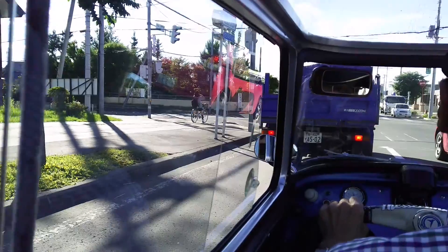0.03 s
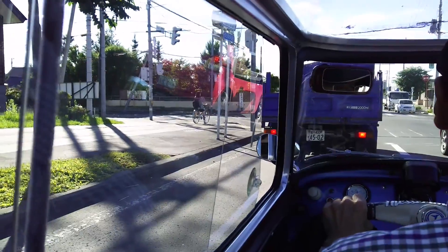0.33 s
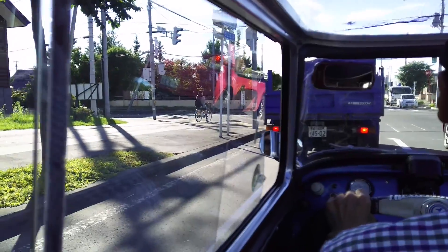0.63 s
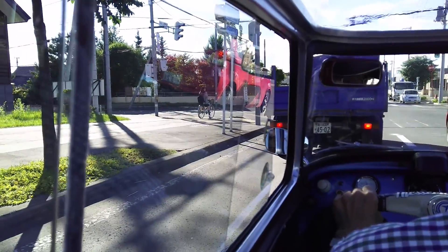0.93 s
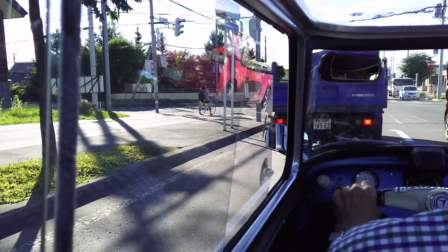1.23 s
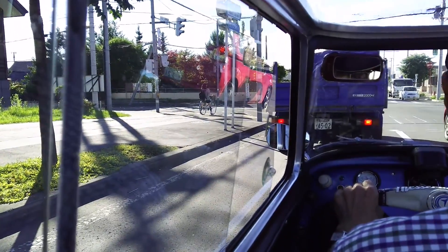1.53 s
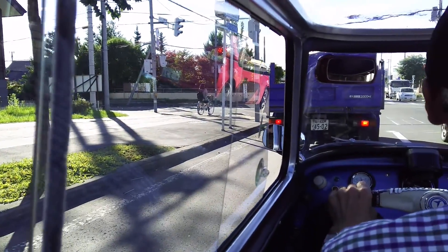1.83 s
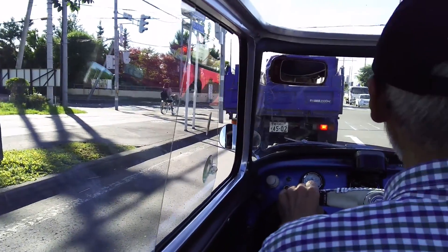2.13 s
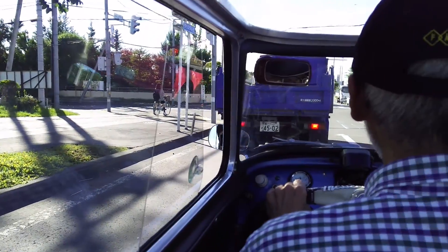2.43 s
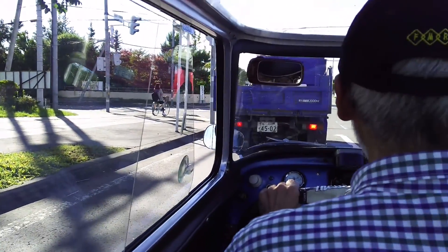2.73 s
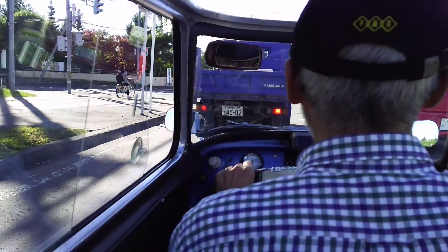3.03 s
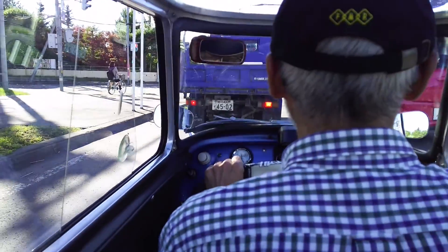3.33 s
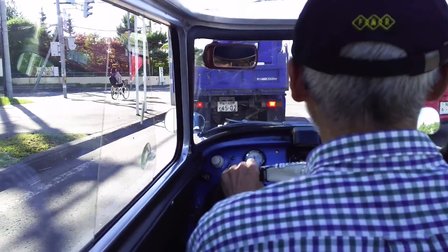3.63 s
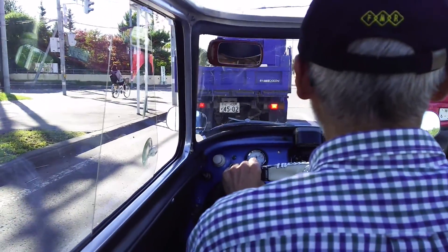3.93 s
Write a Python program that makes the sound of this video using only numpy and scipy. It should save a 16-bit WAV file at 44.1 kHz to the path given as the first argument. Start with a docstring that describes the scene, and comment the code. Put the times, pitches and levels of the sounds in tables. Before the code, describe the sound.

A small engine idles throughout, heard inside a stopped car, slightly to the right. It hums and clatters, with uneven low thumps several times a second, each ringing a metal part. Faint traffic hiss and another engine's drone lie underneath. Loose trim clicks occasionally and knocks until about 2.3 seconds. Near 3 seconds come a soft scuff and rustle, then a light whirr and high hiss swell.

```python
"""A tiny single-cylinder engine idles, heard inside a small car at a junction. From the start traffic
hisses, another idle drones, and the shaft hums, clatters and ticks once a turn. Every second to fifth
turn a hard firing booms in the cabin, barks in the exhaust and rings a metal part. Loose trim clicks
and, until about 2.3 s, knocks. Near 3 s it scuffs and rustles; then a bearing whirr and a high street
hiss swell, and the sound leans further to the right."""
import sys
import numpy as np
from scipy import signal
from scipy.fft import rfft, irfft, next_fast_len
from scipy.io import wavfile
from scipy.ndimage import uniform_filter1d, minimum_filter1d, map_coordinates

SR = 44100
rng = np.random.default_rng(int(sys.argv[2]) if len(sys.argv) > 2 else 0)


def log_audio(samples):
    """Write samples as a 16-bit WAV file to the path given in sys.argv[1]."""
    # one column per channel
    frames = np.atleast_2d(samples).T
    # limit to full scale, then quantise
    limited = np.clip(frames, -1, 1)
    pcm = np.round(limited * 32767).astype(np.int16)
    wavfile.write(sys.argv[1], SR, pcm)


N = 176400
TURNS_PER_S = 24.87
LEFT_RIGHT = np.array([[.5], [-.5]])  # splits a difference between the ears

# Hard firings and the relative level of each effect: time_s, ring_db, boom_db, bark_db, rasp_db
FIRINGS = [(0.132, -39, -16.5, -27, -45.5), (0.254, -35.5, -10, -25, -44.5),
           (0.373, -45, -22.5, -27.5, -45.5), (0.45, -36.5, -13.5, -34, -46),
           (0.573, -35, -17.5, -23, -45.5), (0.693, -35.5, -14.5, -24, -52), (0.812, -36, -10, -32, -48),
           (0.929, -43.5, -12, -28.5, -45.5), (1.13, -38, -11, -27, -45), (1.247, -35.5, -12.5, -30, -42.5),
           (1.363, -46.0, -11.5, -36, -52.5), (1.447, -37, -9, -32, -55.5), (1.567, -40.5, -13.5, -23, -43),
           (1.727, -37, -14, -26.5, -43.5), (1.844, -53, -14, -30.5, -43.5),
           (1.922, -45, -12.5, -31, -51.5), (2.046, -34.5, -14.5, -27.5, -45.5),
           (2.249, -34, -9, -27.5, -47.5), (2.371, -31, -15, -27.5, -44),
           (2.491, -32.5, -12.5, -31.5, -54.5), (2.611, -36, -15, -34, -54),
           (2.774, -35.5, -10.5, -27.5, -44), (2.978, -30.5, -7.5, -29.5, -47),
           (3.098, -43, -26, -36.5, -52.5), (3.18, -32.5, -11.5, -31, -47),
           (3.302, -27.5, -13, -29.5, -44.5), (3.422, -30.5, -18, -36, -49),
           (3.544, -37.5, -14.5, -34, -52), (3.626, -39.5, -20.5, -41.5, -48.5),
           (3.705, -39, -15, -35.5, -50.5), (3.788, -32.5, -11, -27, -48),
           (3.909, -30, -14.5, -29.5, -48.5)]
# Slow swells of three steady layers: time_s, traffic_db, whirr_db, clatter_db
SWELLS = [(0, -45, -67, -32), (.25, -49, -55, -32), (.6, -52.5, -73, -32.5), (.9, -54.5, -67.5, -31),
          (1.6, -54.5, -52.5, -32.5), (2.3, -53.5, -70, -33.5), (2.68, -54.5, -66, -37.5),
          (2.9, -55.5, -50.5, -30.5), (3.2, -53.5, -51.5, -34.5), (3.501, -56.5, -47, -34.5),
          (4, -55.5, -51.5, -34.5)]


def amp(db):
    """Decibels to amplitude ratio."""
    return 10 ** (np.asarray(db) / 20)


def unit(x):
    """Normalisation to rms 1."""
    return x / np.sqrt(np.mean(x ** 2) + 1e-20)


def along(points, hz):
    """Interpolation of (frequency_hz, value) points on a logarithmic axis."""
    f, v = np.transpose(points)
    return np.interp(np.log(hz + 1), np.log(f + 1), v)


def clock():
    """Time of every sample in seconds."""
    return np.arange(N) / SR


def contour(table, column=1):
    """Linear interpolation of one column over time."""
    columns = np.transpose(table)
    return np.interp(clock(), columns[0], columns[column])


def wobble(rate):
    """Smooth random modulation, with rate knots a second."""
    return map_coordinates(rng.standard_normal(int(N * rate / SR) + 4), [clock() * rate])


def filtered(x, response):
    """Linear filtering: the spectrum times a frequency response."""
    m = next_fast_len(N + SR // 2)
    return irfft(rfft(x, m) * response(np.fft.rfftfreq(m, 1 / SR)), m)[..., :N]


def noise(gain):
    """Interaural coherence: stereo noise of rms 1, alike at both ears in the bass only."""
    # Likeness of left and right: frequency_hz, correlation
    coherence = [(150, 0.97), (300, 0.86), (600, 0.45), (1200, 0.039), (2000, -0.21), (3000, 0.14),
                 (12000, -0.039)]

    def response(hz):
        angle = np.arccos(np.clip(along(coherence, hz), -1, 1)) / 2
        return gain(hz) * np.array([np.cos(angle), np.sin(angle)])
    mid, side = filtered(rng.standard_normal((2, N)), response)
    return unit(np.array([mid + side, mid - side]))


def rush(spectrum):
    """Broadband noise of a given spectral shape."""
    return noise(lambda hz: amp(along(spectrum, hz)))


def narrow(centre_hz, width_hz):
    """Random excitation of one resonance."""
    return noise(lambda hz: 1 / (1 + (2 * (hz - centre_hz) / width_hz) ** 2))


def patchy(x, depth_db=2):
    """Random modulation in small patches of time and frequency."""
    spectrogram = signal.stft(x, nperseg=1024)[2]
    field = uniform_filter1d(rng.standard_normal(spectrogram.shape[1:]), size=6, axis=0)
    field = unit(uniform_filter1d(field, size=5, axis=1))
    return unit(signal.istft(spectrogram * amp(depth_db * field), nperseg=1024)[1][:, :N])


def bursts(times, levels_db, attack_s, t60_s):
    """Envelope with a Gaussian rise to each time and an exponential decay after it."""
    out, t = np.zeros(N), clock()
    for s, db in zip(times, levels_db):
        rise = np.exp(-(np.minimum(t - s, 0) / attack_s) ** 2)
        out += rise * amp(db - 60 * np.clip(t - s, 0, 2 * t60_s) / t60_s)
    return out


def struck(times, levels_db, modes, attack_s, scatter_db, detune):
    """Free vibration: a complex sum of damped modes, a little different at every blow."""
    out, t = np.zeros(N + SR, complex), np.arange(SR // 4) / SR
    hz, db, t60_s = np.transpose(modes)[:, :, None]
    rise = 1 - np.exp(-(t / attack_s) ** 2)
    for s, level in zip(times, levels_db):
        size, pitch = rng.standard_normal((2, len(modes), 1))
        decay = amp(level + db + scatter_db * size - 60 * t / t60_s)
        tones = np.exp(2j * np.pi * hz * (1 + detune * pitch) * t)
        out[max(round(s * SR), 0):][:len(t)] += (decay * tones).sum(0) * rise
    return out[:N]


def once_a_turn(turns, lead_s, decay_s):
    """Periodic excitation: a decaying pulse of slightly varying size on every turn, rms 1."""
    count, part = np.divmod(turns - np.floor(turns[0]) + 1 + lead_s * TURNS_PER_S, 1)
    sizes = amp(2 * rng.standard_normal(size=128))
    pulses = sizes[count.astype(int)] * np.exp(-part / TURNS_PER_S / decay_s)
    return unit(uniform_filter1d(pulses, int(.002 * SR)))  # 2 ms edges


def traffic(turns):
    """Broadband street noise, with a little of the engine's own hiss pulsing in it."""
    # Spectra of the street hiss and of a higher fizz: frequency_hz, density_db
    hiss_spectrum = [(200, -9), (1000, 8), (2000, 4.5), (2800, 2), (3200, -1.5), (4200, -2), (5200, -3.5),
                     (7000, -2.5), (8200, -14), (9400, -8), (11200, -9.5), (13000, -26.5), (15000, -41.5)]
    fizz_spectrum = [(3000, -26), (4200, -6.5), (5000, 2.5), (6000, -2.5), (7200, -13), (9000, -14.5),
                     (14000, -39)]
    # Swells of the fizz: time_s, level_db
    fizz_swells = [(0, -60.5), (.5, -54), (1, -71.5), (2.7, -66), (3.101, -59), (3.5, -52.5), (4, -53)]
    flutter = unit(1 + .13 * once_a_turn(turns, lead_s=.0037, decay_s=.008))
    fizz = amp(contour(fizz_swells)) * patchy(rush(fizz_spectrum))
    hiss_db = contour(SWELLS, column=1) + 2.8 + .42 * wobble(3.1)
    return amp(hiss_db) * flutter * patchy(rush(hiss_spectrum)) + fizz


def other_idle():
    """Beating: a second engine drones near twice the shaft rate and interferes with the hum."""
    # Partials of the drone: harmonic_number, level_db
    harmonics = [(1, -20), (2, -23.5), (3, -23), (5, -36.5), (6, -47), (7, -45.5), (8, -48.5), (9, -46)]
    # Drift of its fundamental: time_s, pitch_hz
    pitch = [(0, 49.7), (.7, 49.8), (1.4, 50.2), (2.2, 49.7), (3, 49.2), (4, 49.5)]
    angle = 2 * np.pi * np.cumsum(contour(pitch)) / SR
    return np.sqrt(2) * sum(amp(db + 1.33 * wobble(5.58)) * np.sin(k * angle + rng.uniform(0, 2 * np.pi))
                            for k, db in harmonics)


def loose_trim():
    """Impact and friction: loose parts of the cabin click, knock, scuff and rustle."""
    # Clicks and panel knocks: time_s, level_db
    click_events = [(0.022, -38.5), (0.0342, -32.5), (0.0642, -38.5), (0.145, -42), (0.4698, -41.5),
                    (1.077, -36.5), (2.0393, -43), (2.8855, -48), (3.311, -39.5)]
    knock_events = [(0.148, -21), (0.366, -24.5), (0.486, -17), (0.566, -15), (0.606, -12.5),
                    (0.688, -11.5), (0.853, -19), (0.925, -17.5), (1.05, -24), (1.164, -15.5), (1.6, -13.5),
                    (2.246, -17), (2.281, -9.5)]
    # Spectra of click and rustle: frequency_hz, density_db
    click_spectrum = [(500, -8), (2000, -8), (4000, 1), (5500, 0), (7000, -6), (9000, -10.5), (12000, -13),
                      (15000, -26)]
    rustle_spectrum = [(2500, -14), (6000, 0), (10500, -1), (13000, -15), (15000, -32)]
    # Well damped panel modes: frequency_hz, level_db, t60_s
    panel_modes = [(135, 0.5, .04), (250, -2, 0.039), (379, -4, 0.042), (543, -4, 0.035), (800, -14, .02),
                   (970, -20, 0.015)]
    click_s, click_db = np.transpose(click_events)
    knock_s, knock_db = np.transpose(knock_events)
    clicks = rush(click_spectrum) * bursts(click_s + .0031, click_db - .5, attack_s=.0025, t60_s=.054)
    knocks = struck(knock_s, knock_db + 1, panel_modes, attack_s=.0015, scatter_db=1.5, detune=.058).imag
    scuff = narrow(3100, width_hz=800) * bursts([2.865], [-41], attack_s=.039, t60_s=.11)
    rustle = rush(rustle_spectrum) * bursts([3.115], [-57], attack_s=.03, t60_s=.5)
    return clicks + knocks + scuff + rustle


def shaft_turns():
    """Flywheel inertia evens out the speed: turns so far, with the firings near whole turns."""
    firing_s = np.transpose(FIRINGS)[0]
    whole = np.cumsum(np.round(np.diff(firing_s, prepend=firing_s[0]) * TURNS_PER_S))
    drift = np.interp(clock(), firing_s, whole - firing_s * TURNS_PER_S)
    return clock() * TURNS_PER_S + uniform_filter1d(drift, int(.25 * SR))


def bearing_whirr():
    """Frequency and amplitude modulation: each bearing tone wavers and flickers on its own."""
    # Bearing tones: pitch_hz, level_db
    tones = [(1955, 0.5), (2060, -5), (2210, -8), (2590, -11.5), (2690, -6.5)]
    waver, flicker_db = .011, 4
    out = np.zeros((2, N))
    for hz, db in tones:
        pitch_hz = hz * (1 + waver * (wobble(22) + wobble(160)) / np.sqrt(2))
        angle = 2 * np.pi * np.cumsum(pitch_hz) / SR
        level = amp(db + flicker_db * wobble(25))
        ear_phases = np.array([wobble(14), wobble(14)])
        out += level * np.sin(angle + ear_phases)
    return unit(out)


def mechanism(turns):
    """Forced vibration: clatter, tick and whirr pulse with the shaft, over rumble and resonances."""
    # Spectra of the running machinery: frequency_hz, density_db
    clatter_spectrum = [(170, -28.5), (250, -3.5), (420, -4), (560, -11.5), (800, -13), (1250, -18.5),
                        (1750, -23.5), (2800, -26), (3150, -36.5), (6300, -40), (12000, -60.5)]
    tick_spectrum = [(2000, -6), (5000, -1), (8300, -14), (9000, -3), (9400, 7), (9900, -4), (10600, -5),
                     (11100, 2), (11600, -8), (12300, -20.5), (15000, -32.5)]
    rumble_spectrum = [(20, -24.5), (36, -22), (45, -9), (62, -1), (78, -15), (92, -2), (120, -3),
                       (170, -3.5), (192, -16.5), (225, -14), (300, -23.5), (600, -30.5), (1500, -46),
                       (4000, -76.5)]
    # Resonances stirred by the engine: centre_hz, width_hz, level_db
    resonances = [(687, 44, -46), (1056.5, 28, -51.5), (1490, 67, -52.5), (2565, 73, -61),
                  (2764, 77, -65.5), (4920, 45, -70), (6180, 60, -70.5)]
    main_pulse = once_a_turn(turns, lead_s=.0076, decay_s=.019)
    early_pulse = once_a_turn(turns, lead_s=.026, decay_s=.012)
    throb = unit(.95 + main_pulse + .26 * early_pulse)
    clatter = amp(contour(SWELLS, column=3)) * throb * rush(clatter_spectrum)
    tick = amp(-61.5) * once_a_turn(turns, lead_s=.0036, decay_s=.003) * rush(tick_spectrum)
    singing = sum(amp(db) * narrow(hz, width) for hz, width, db in resonances)
    whirr = amp(contour(SWELLS, column=2)) * throb * bearing_whirr()
    return clatter + tick + singing + whirr + amp(-19.5) * rush(rumble_spectrum)


def shaft_hum(turns):
    """Harmonic series of the rotation rate, each order wavering slightly in level."""
    # Shaft orders: cycles_per_turn, level_db
    orders = [(2, -32), (3, -37.5), (4, -27.5), (5, -27.5), (7, -39.5), (15, -48)]
    lag_s, waver_db = .00501, 1.5
    angle = 2 * np.pi * (turns - lag_s * TURNS_PER_S)
    return np.sqrt(2) * sum(amp(db + waver_db * wobble(7.4)) * np.cos(k * angle) for k, db in orders)


def seat_chatter(firing_s, ring_db):
    """Repeated impact: at each firing the metal part hits its seat four times, unevenly."""
    # Short-lived contact modes: frequency_hz, level_db, t60_s
    modes = [(1270, -2, .02), (1580, 2, .02), (1820, -8, .015), (2200, -10, .015), (2480, -10, 0.016),
             (2725, -8, 0.018)]
    slip = rng.uniform(-1, 1, size=(len(firing_s), 4))
    place = np.linspace(-1, 1, 4)
    contact_s = firing_s[:, None] + .011 * (place + slip / 2)
    contact_db = -27.5 + .3 * ring_db[:, None] - 5 * place ** 2  # first and last are weaker
    contact_db += 2 * rng.standard_normal(slip.shape)
    return struck(contact_s.ravel(), contact_db.ravel(), modes, attack_s=.0012, scatter_db=2.5, detune=.03)


def metal_part(firing_s, ring_db):
    """Modal ringing: each firing sets a metal part sounding, roughly and with chatter."""
    # Modes of the part: frequency_hz, level_db, t60_s
    modes = [(1382, -1.5, 0.073), (1473, -7, 0.051), (1508, 5, 0.081), (1612, -12.5, 0.05),
             (1740, -21.5, 0.044), (1970, -16, .05)]
    # Resonances that swell with the ring: centre_hz, width_hz, relative_db, lead_s
    resonances = [(1955, 60, -16, .006), (2690, 70, -17, .022), (4920, 60, -26, .002)]
    rough_db, ear_phase_rad = 3.2, -1.5
    ring = amp(13) * struck(firing_s - .013, ring_db, modes, attack_s=.012, scatter_db=2, detune=.0051)
    rattle = ring * amp(rough_db * wobble(250)) + seat_chatter(firing_s, ring_db)
    overtones = sum(narrow(hz, width) * bursts(firing_s - lead_s, ring_db + db, attack_s=.012, t60_s=.12)
                    for hz, width, db, lead_s in resonances)
    return (rattle * np.exp(1j * ear_phase_rad * LEFT_RIGHT)).imag + overtones


def exhaust(firing_s, bark_db, rasp_db):
    """Transient noise: each firing gives a low bark and a longer, brighter rasp."""
    # Spectra of bark and rasp: frequency_hz, density_db
    bark_spectrum = [(150, -22.5), (260, 3.5), (420, 1.5), (700, -6), (1000, -12), (1800, -19),
                     (3000, -28.5), (8000, -56)]
    rasp_spectrum = [(900, -20), (1800, 2.5), (2300, 3), (2750, 5.5), (3200, -14), (6000, -11.5),
                     (9000, -27), (14000, -38.5)]
    bark = rush(bark_spectrum) * bursts(firing_s - .003, bark_db + 1.5, attack_s=.012, t60_s=.098)
    rasp = rush(rasp_spectrum) * bursts(firing_s - .012, rasp_db + 3.5, attack_s=.013, t60_s=.23)
    return bark + rasp


def cabin_boom(turns, firing_s, boom_db):
    """Cavity resonance: a hard firing kicks the cabin's modes, and again half a turn later."""
    # Cabin modes: frequency_hz, level_db, t60_s
    modes = [(44.2, -12, 0.44), (61.5, -10, 0.25), (91.3, -6, 0.18), (108.7, 1, 0.2), (121.5, -7.5, 0.23),
             (136.7, -11, 0.099), (161.8, -14, 0.12), (206, -22.5, 0.068)]
    lead_s = .00759
    nearest_turn = np.round(np.interp(firing_s, clock(), turns))
    kick_s = np.interp(nearest_turn, turns, clock()) - lead_s
    blow_s = np.concatenate([kick_s, kick_s + .5 / TURNS_PER_S])
    return amp(5) * struck(blow_s, np.tile(boom_db, 2), modes, attack_s=.0069, scatter_db=.5, detune=.017).imag


def scene():
    """Superposition: all sources meet in the cabin, stronger on the right."""
    # Late shift to the right: time_s, left_minus_right_db
    lean = [(3.299, 1), (3.75, -1.5)]
    # Level difference between the ears: frequency_hz, left_minus_right_db
    balance = [(50, -4.5), (130, -5), (230, -7.5), (380, -0.5), (600, -2), (1100, -4.5), (2000, -7),
               (3200, -4.5), (5000, -5), (7500, -9), (9000, -10.5), (11000, 3), (13000, 1)]
    firing_s, ring_db, boom_db, bark_db, rasp_db = np.transpose(FIRINGS)
    turns = shaft_turns()
    hums = shaft_hum(turns) + other_idle()
    boom = cabin_boom(turns, firing_s, boom_db)
    firings = boom + metal_part(firing_s, ring_db) + exhaust(firing_s, bark_db, rasp_db)
    cabin = hums + firings + mechanism(turns) + loose_trim() + traffic(turns)
    cabin *= amp(contour(lean) * LEFT_RIGHT)
    return filtered(cabin, lambda hz: amp(along(balance, hz) * LEFT_RIGHT))


def record(dry):
    """Band and peak limiting: the deepest bass softens, big booms are held down, the top is cut."""
    ceiling, window, top_hz = .92, int(.012 * SR), 15300
    x = filtered(dry, lambda hz: amp(along([(20, -8.5), (33, -10.5), (41, -.5)], hz)))
    needed = ceiling / np.maximum(np.abs(x).max(0), ceiling)
    gain = uniform_filter1d(minimum_filter1d(needed, 2 * window), window)
    return filtered(x * gain, lambda hz: hz < top_hz)


dry = scene()
out = record(dry)
log_audio(out)
```